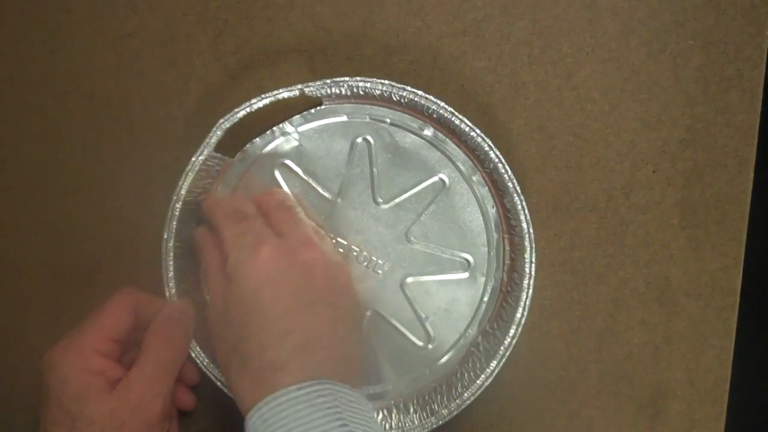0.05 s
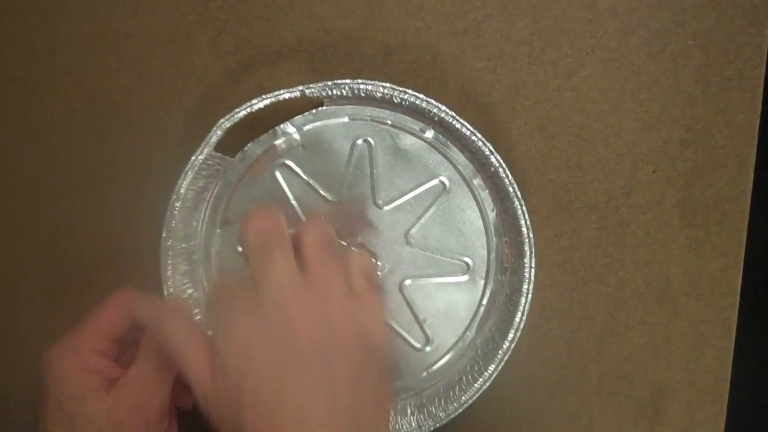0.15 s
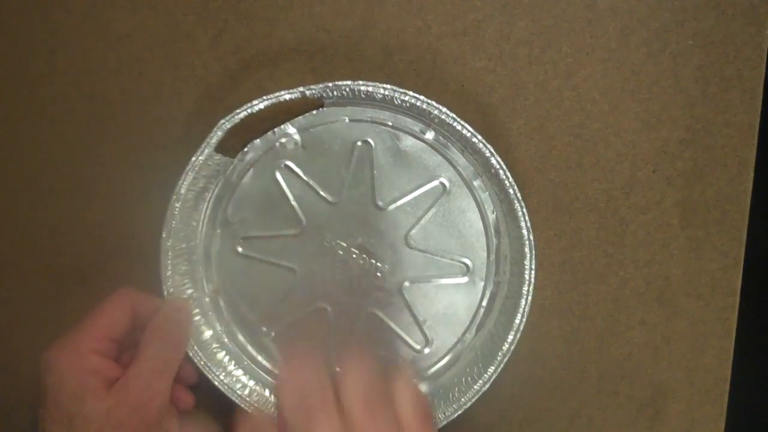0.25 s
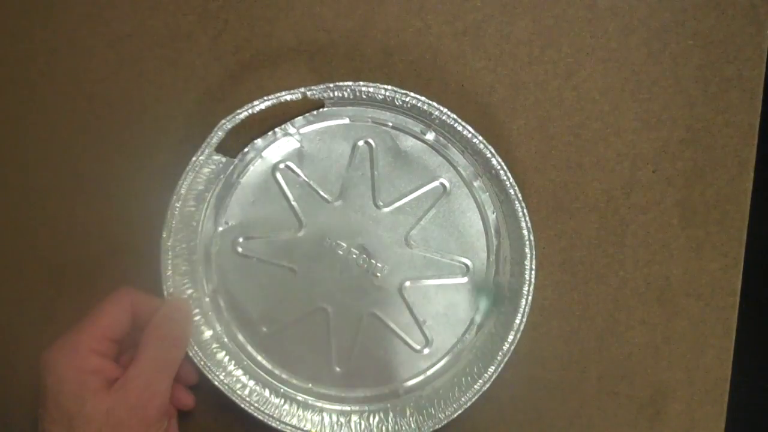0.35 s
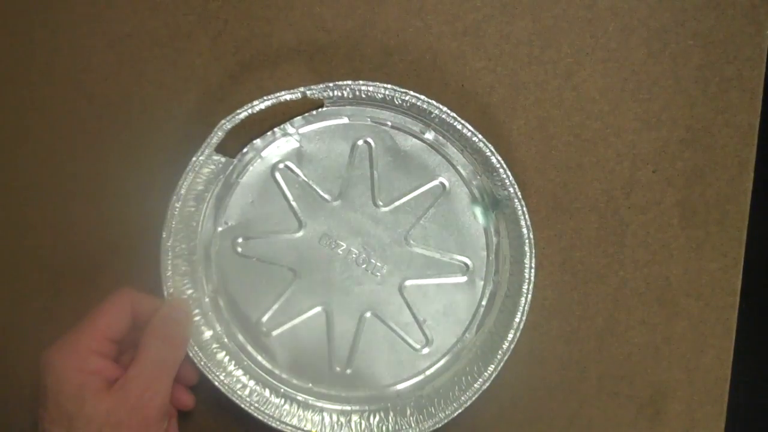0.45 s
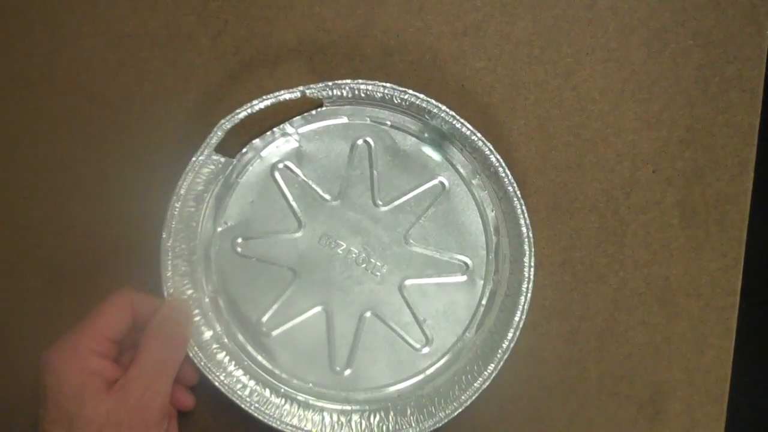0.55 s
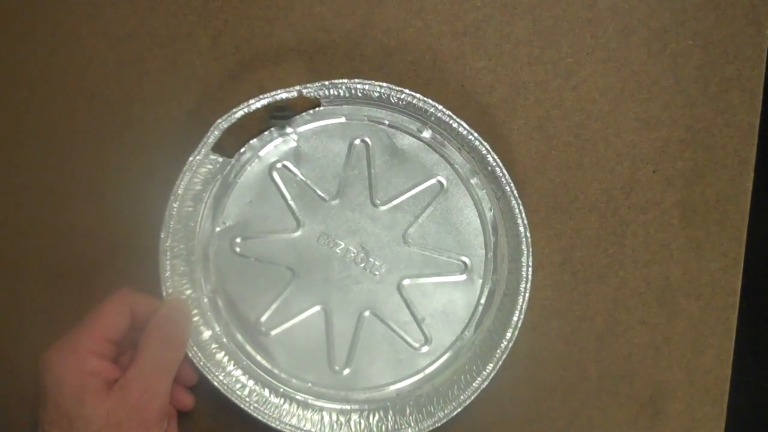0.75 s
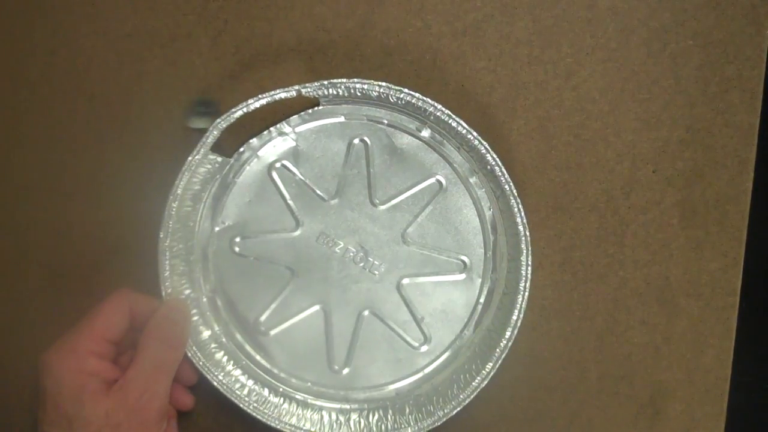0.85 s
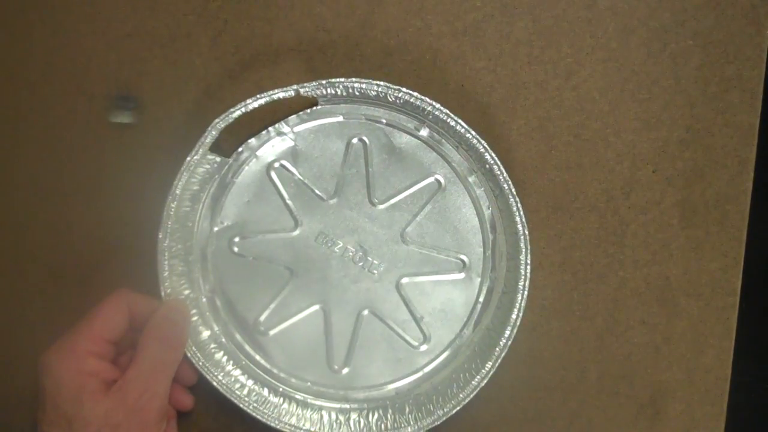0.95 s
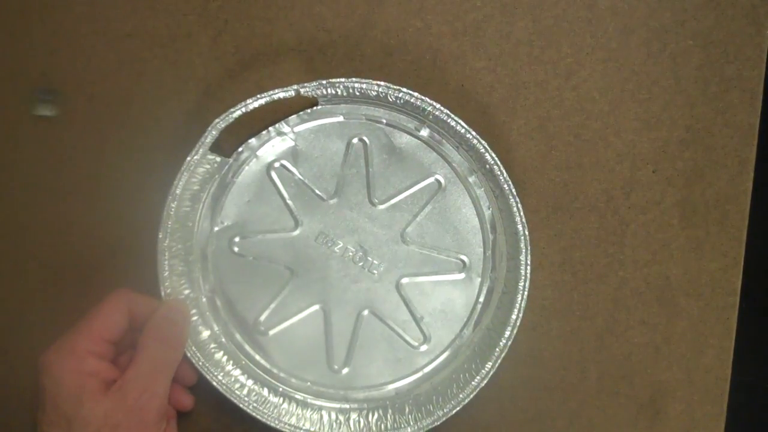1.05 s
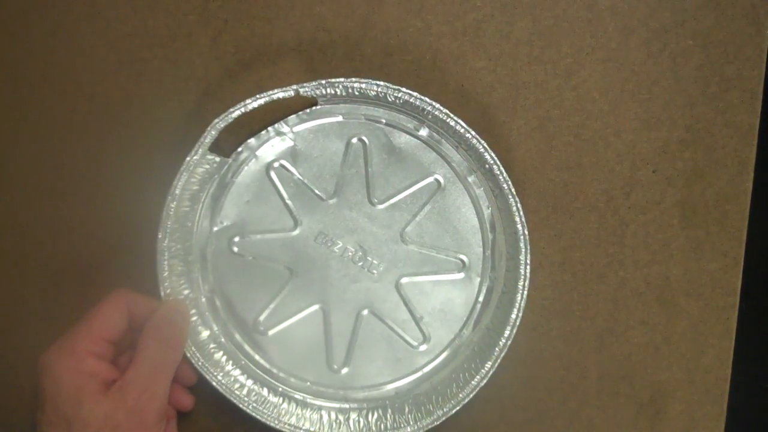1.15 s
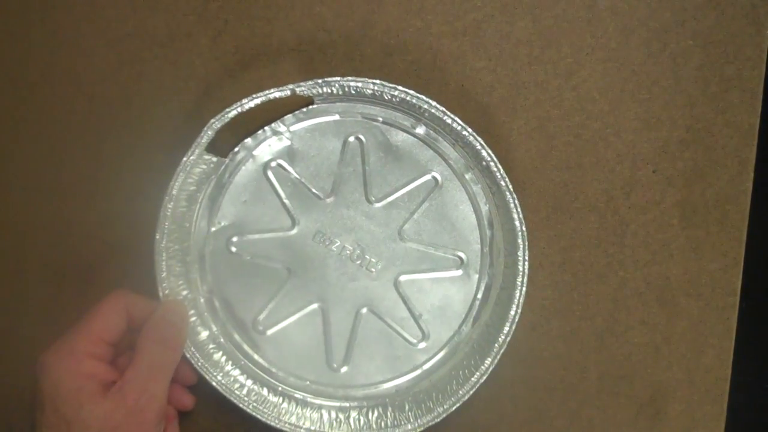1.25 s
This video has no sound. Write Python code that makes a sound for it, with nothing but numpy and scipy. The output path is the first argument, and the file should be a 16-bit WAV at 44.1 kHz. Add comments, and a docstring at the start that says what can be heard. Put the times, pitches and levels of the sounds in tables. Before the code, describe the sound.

Marble rolling fast round a thin metal pie plate, dropping out with a sharp click.

```python
"""Marble in a pie plate

A flicked glass marble runs round the wall of a thin aluminium pie plate, chattering over the crimps
as it slows; each impact rings the crowded modes of the foil. It leaves through a gap in the rim,
knocks sharply on the table and rolls away over the board. A small room, heard from close above."""
import sys
import numpy as np
from scipy import signal
from scipy.fft import rfft, irfft
from scipy.io import wavfile
from scipy.ndimage import uniform_filter1d, minimum_filter1d

SR = 44100
rng = np.random.default_rng(int(sys.argv[2]) if len(sys.argv) > 2 else 0)


def store_wav(level_fs):
    """Save 16-bit WAV to argv[1]."""
    pcm = np.round(np.clip(np.atleast_2d(level_fs), -1, 1) * 32767)
    wavfile.write(sys.argv[1], SR, pcm.T.astype(np.int16))


N = 57330

# Chatter on the crimps. Each row: start and length in seconds, level in dB, extra treble in dB.
RATTLES = [(.2315, .003, -26, -4), (0.2399, 0.0045, -30.5, 9), (0.247, 0.0048, -29.5, 13),
           (0.254, 0.018, -24, 4), (.272, 0.0034, -17.5, 2), (0.281, 0.0065, -22.5, 10),
           (0.289, 0.016, -21.5, -24), (.315, 0.0071, -21.5, 7.5), (0.353, .007, -20.5, 5),
           (0.367, 0.018, -25.5, -20), (0.391, 0.0038, -19, -5), (0.413, 0.012, -28, 7),
           (0.433, 0.0031, -19.5, -2.5), (0.456, 0.016, -25, 1.5), (0.483, 0.0022, -21.5, -2.5),
           (0.521, 0.012, -26, -0.5), (0.539, 0.0023, -28, 6.5), (0.551, .003, -32, 6.5),
           (0.575, 0.011, -40.5, 15.5), (0.614, 0.002, -21, -3.5), (0.621, 0.0036, -34, 8.5),
           (0.629, 0.0034, -28, 5.5), (0.646, 0.015, -30, 1.5), (0.665, 0.016, -38.5, 0.5),
           (0.692, 0.0046, -35.5, 7.5), (0.698, 0.0092, -30, 5), (0.746, 0.009, -28, 0.5),
           (0.798, 0.0081, -37.5, 10), (0.806, 0.011, -32.5, -5), (0.830, 0.0056, -29, -3),
           (0.8575, 0.005, -30, 5), (0.919, 0.0016, -42, 14.5), (0.931, 0.0054, -36.5, -3)]
# Hard ticks of glass on foil. Each row: time in seconds, relative level in dB.
TICKS = [(.188, -47), (.2326, -17.5), (.3905, -14), (.453, -20.5), (.5034, -12.5), (.511, -20), (.557, -27),
         (.563, -22.5), (.569, -22.5), (.602, -23.5), (.6135, -20), (.7695, -28), (.8105, -27),
         (.837, -24.5)]
# Steady rolling in the plate. Each row: time in seconds, foil level in dB, rumble level in dB.
PLATE_ROLL = [(.225, -87, -81), (.232, -49, -65), (.245, -31.5, -45), (.29, -40, -51), (.34, -35, -55),
              (.41, -34, -42.5), (.47, -35.5, -40), (.55, -34.5, -43), (.60, -38, -51.5), (.65, -43, -49.5),
              (.72, -38.5, -49.5), (.79, -40, -54.5), (.83, -40.5, -46.5), (.89, -41, -64),
              (.935, -42, -60.5), (.955, -72, -71)]
# Foil rustling under the fingers, up to the flick. Each row: time in seconds, level in dB.
HANDLING = [(0, -53), (.04, -59.5), (.14, -58.5), (.21, -63.5), (.23, -30.5), (.24, -89)]
# The plate's broad ring. Each row: frequency in Hz, relative dB at the path's start, middle and end.
FOIL_BODY = [(80, -73, -60, -58), (300, -26, -23.5, -26), (810, -15, -14, -14), (1036, -10, -8.5, -3),
             (1270, -1, 2, -1.5), (1710, -6.5, -5.5, -9), (2050, 3.5, -2, -10), (2500, -2, -4.5, -8),
             (3080, -4, -6, -5.5), (3980, -14, -14, -11.5), (6060, -10, -9.5, -12.5),
             (12400, -76, -90, -91)]
# The foil's bright sizzle and its low rumble. Each row: frequency in Hz, relative level in dB.
FOIL_TREBLE = [(200, -59), (1000, -31.5), (3000, -10), (4500, -9.5), (5400, -6), (6300, 3), (7100, 0.5),
               (7900, -1), (8700, -10.5), (10000, -18), (12000, -26), (14000, -27.5)]
FOIL_RUMBLE = [(30, -27), (65, -17), (110, -18.5), (200, -7.5), (290, -0.5), (370, 6), (450, -3.5),
               (640, 3), (900, -3), (1500, -14), (4000, -50)]
# The plate's clearest modes. Each row: frequency in Hz, level in dB, T60 in seconds,
# then the time and half width in seconds of the marble's passage over the antinode.
PLATE_MODES = [(978, -5, 0.13, 0.251, .012), (1044, -3, 0.066, 0.89, 0.047), (1090, -10, 0.14, .318, 0.026),
               (1152, -3.5, 0.056, 0.834, 0.061), (1205, -2.5, 0.079, 0.54, 0.038),
               (1224, 4, 0.054, 0.652, 0.031), (1256, -0.5, 0.049, 0.427, .04),
               (1395, 2, 0.033, 0.368, 0.011), (1450, -5, .12, 0.268, 0.0097),
               (1960, 8.5, 0.078, 0.2826, 0.0045), (2165, -4, 0.074, .32, 0.018),
               (2440, -6, 0.026, .68, 0.18), (2920, -4.5, 0.038, 0.415, 0.047),
               (3165, 0.5, 0.067, .75, 0.02), (3195, 5.5, 0.045, .86, .024), (3230, -10, .04, .355, .01),
               (5300, -4, 0.042, .86, 0.018)]
# Landing, hops and bumps on the table. Each row: time in seconds, level in dB, relative click in dB.
KNOCKS = [(0.9526, -2.5, -7.5), (0.985, -27.5, -8.5), (1.0553, -28.5, -13.5), (1.105, -33, -22),
          (1.1664, -32, -20), (1.172, -35.5, -9), (1.2528, -25.5, -15)]
# Modes of the table top. Each row: frequency in Hz, level in dB before filtering, T60 in seconds.
TABLE_MODES = [(825, -27.5, 0.0066), (1310, 0, 0.037), (1405, -11.5, 0.042), (1710, -19, 0.017),
               (1840, -19, 0.011), (2390, -16, 0.022), (3040, -28, 0.0083)]
# The board's click and its grain under the marble. Each row: frequency in Hz, relative level in dB.
TABLE_CLICK = [(100, -53), (430, -18.5), (680, 3.5), (1700, 18), (3000, 11), (6000, 5.5), (8000, 4.5),
               (11000, -14), (15000, -27)]
TABLE_GRAIN = [(60, -38), (250, -16.5), (600, -9), (1000, -4), (1400, 3.5), (1800, 2), (2400, -32),
               (3500, -29), (6000, -27), (12000, -53)]
# Rolling over the board. Each row: time in seconds, level in dB.
TABLE_ROLL = [(.96, -27), (.98, -34), (1.04, -41), (1.12, -42), (1.20, -40.5), (1.26, -37.5), (1.30, -40)]
# Reflections of the board's ring from nearby surfaces. Each row: delay in seconds, gain in dB.
ECHOES = [(.0023, -7), (.0034, -8), (.0106, -13)]
# Faint hiss with a narrow hum near 1.4 kHz, perhaps a distant marble rolling on the board.
# Each row: frequency in Hz, relative level in dB.
BACKGROUND = [(30, -5), (100, -2), (220, 5.5), (400, 2.5), (900, 0), (1220, 4), (1410, 8.5), (1600, -3.5),
              (1900, 1.5), (4000, -5.5), (6500, -7), (7900, -2.5), (9500, -13.5), (14000, -17.5)]
# The left microphone is the brighter. Each row: frequency in Hz, left minus right in dB.
MIC_BALANCE = [(100, 1), (2400, 0.5), (4400, 0.5), (6300, -3.5), (7200, 5), (8200, 9.5), (10000, 8),
               (12000, 15.5), (14000, 9)]
# Treble roll-off of both microphones. Each row: frequency in Hz, gain in dB.
MIC_ROLL_OFF = [(13900, -0.5), (14600, -23), (16000, -34)]

CONTACTS_PER_S, CONTACT_SCATTER_DB, EVEN_S = 4500, 4.5, 0.008
ATTACK_S, RELEASE_S = 0.00039, 0.0028
BODY_CORRELATION, TREBLE_CORRELATION = 0.86, 0.69  # between left and right
FOIL_T60_S, TICK_T60_S, CRACK_T60_S, CRACK_DB = 0.07, 0.032, 0.0092, 8.5
MODE_LAG_S, MODE_ROLL_DB = 0.003, -31.5  # a burst hits hardest just after its start; rolling is weak
TABLE_BAND_HZ, CLICK_T60_S, GRAIN_DB = (730, 2490), 0.031, -2.5
SNAP_DB, SNAP_T60_S = 5.5, 0.0073  # the first instant of glass on the board
ROOM_T60_S, ROOM_DB, ROOM_DELAY_S, BACKGROUND_DB = 0.57, -17, 0.0053, -56
LIMIT, LIMIT_S, TOP_HZ = 0.95, 0.001, 16000


def plate():
    """Incoherent impacts add in power and ring the foil; its floor rumbles under the marble's weight."""
    t = np.arange(N) / SR
    body_power = amp(curve(PLATE_ROLL)) ** 2
    treble_power = body_power + amp(curve(HANDLING)) ** 2
    for start, length, db, treble_db in RATTLES:
        attack = np.clip((t - start) / ATTACK_S, 0, 1)
        burst = attack * np.exp(-np.maximum(t - start - length, 0) / RELEASE_S)
        body_power += (burst * amp(db)) ** 2
        treble_power += (burst * amp(db + treble_db)) ** 2
    grains = contacts()
    push = grains * np.sqrt(body_power)
    body = travel(push, FOIL_BODY, BODY_CORRELATION)
    sizzle = travel(grains * np.sqrt(treble_power), FOIL_TREBLE, TREBLE_CORRELATION)
    ticks = 10 * drive(blows(TICKS), foil(FOIL_TREBLE, TREBLE_CORRELATION, TICK_T60_S))
    floor = unit(colour(signal.unit_impulse(N), FOIL_RUMBLE))
    rumble = drive(contacts() * amp(curve(PLATE_ROLL, column=2)), floor)
    return body + sizzle + pings(push) + ticks + rumble


def contacts():
    """Rolling contact is a dense train of random micro-impacts, here evened to an rms of 1."""
    hit = rng.random(N) < CONTACTS_PER_S / SR
    push = hit * rng.choice([-1, 1], N) * amp(CONTACT_SCATTER_DB * rng.standard_normal(N))
    return push / np.sqrt(uniform_filter1d(push ** 2, int(EVEN_S * SR)) + 1e-9)


def foil(spectrum, correlation, t60_s):
    """The modes of thin metal overlap into decaying noise: a crack, then a short ring."""
    envelope = fade(t60_s) + amp(CRACK_DB) * fade(CRACK_T60_S)
    return unit(colour(stereo_noise(correlation) * envelope, spectrum))


def travel(push, spectrum, correlation, spots=6):
    """A plate's response depends on the driving point, so it changes along the marble's path."""
    place = np.interp(np.arange(N) / SR, [PLATE_ROLL[0][0], PLATE_ROLL[-1][0]], [0, spots - 1])
    sound = 0
    for spot, progress in enumerate(np.linspace(0, 1, spots)):
        local = [(hz, np.interp(progress, np.linspace(0, 1, len(dbs)), dbs)) for hz, *dbs in spectrum]
        nearness = np.sqrt(np.maximum(1 - abs(place - spot), 0))
        sound += drive(push * nearness, foil(local, correlation, FOIL_T60_S))
    return sound


def pings(rolling):
    """A mode is driven best at its antinode, so the pitch of the pings changes along the wall."""
    t = np.arange(N) / SR
    strikes = blows([(start + MODE_LAG_S, db) for start, _, db, _ in RATTLES])
    push = strikes + amp(MODE_ROLL_DB) * rolling
    return sum(drive(push * np.exp(-((t - crossing) / width) ** 2), ring([(hz, db, t60)]))
               for hz, db, t60, crossing, width in PLATE_MODES)


def table():
    """Impact and rolling excite the same damped modes of the board; hard contact adds click and grain."""
    band = signal.butter(2, TABLE_BAND_HZ, "band", fs=SR, output="sos")
    board = signal.sosfilt(band, -ring(TABLE_MODES))
    board += drive(board, blows(ECHOES))[0]
    click_envelope = fade(CLICK_T60_S) + amp(SNAP_DB) * fade(SNAP_T60_S)
    click = unit(colour(stereo_noise(0.76) * click_envelope, TABLE_CLICK))
    knocks = drive(blows([(s, db) for s, db, _ in KNOCKS]), board)
    clicks = 10 * drive(blows([(s, db + click_db) for s, db, click_db in KNOCKS]), click)
    roll_gain = amp(curve(TABLE_ROLL))
    grain = colour(stereo_noise(0.91) * abs(contacts()), TABLE_GRAIN)
    rolling = drive(contacts() * roll_gain, unit(board))
    return knocks + clicks + rolling + amp(GRAIN_DB) * roll_gain * grain / grain.std()


def reverberation(direct):
    """Diffuse reflections arrive after a short delay and decay exponentially."""
    arrived = np.arange(N) / SR > ROOM_DELAY_S
    room = unit(stereo_noise(0.65) * fade(ROOM_T60_S) * arrived)
    return amp(ROOM_DB) * drive(direct, room)


def background():
    """Stationary noise is heard as hiss, and a narrow peak in its spectrum as a hum."""
    noise = colour(stereo_noise(0.35), BACKGROUND)
    return amp(BACKGROUND_DB) * noise / noise.std()


def amp(db):
    """Amplitude grows tenfold for every 20 dB."""
    return 10 ** (np.asarray(db) / 20)


def curve(points, column=1):
    """A level in dB moves linearly between timed rows, silent before the first."""
    rows = np.array(points)
    return np.interp(np.arange(N) / SR, rows[:, 0], rows[:, column], left=-120)


def colour(x, points):
    """Folding the cepstrum gives a causal, minimum-phase filter through (Hz, dB) points."""
    rows, size = np.array(points), 2 * N
    hz = np.maximum(np.fft.rfftfreq(size, 1 / SR), 1)
    gain = amp(np.interp(np.log(hz), np.log(rows[:, 0]), rows[:, 1]))
    cepstrum = irfft(np.log(gain))
    cepstrum[1:N] *= 2
    cepstrum[N + 1:] = 0
    return irfft(rfft(x, size) * np.exp(rfft(cepstrum)))[..., :N]


def unit(response):
    """A response scaled to unit energy preserves the power of white noise."""
    return response / np.sqrt(N * np.mean(response ** 2))


def drive(push, response):
    """A linear body convolves the force with its impulse response."""
    return signal.fftconvolve(np.atleast_2d(push), np.atleast_2d(response), axes=-1)[:, :N]


def fade(t60_s):
    """Damping gives an exponential decay, 60 dB in t60_s."""
    return np.exp(-np.log(1000) * np.arange(N) / SR / t60_s)


def stereo_noise(correlation):
    """The balance of common and opposed noise sets the correlation of left and right."""
    mid, side = rng.standard_normal((2, N))
    return np.sqrt((1 + correlation) / 2) * mid + np.sqrt((1 - correlation) / 2) * np.array([side, -side])


def ring(modes):
    """Struck modes are damped sines, differentiated because a small radiator gives out no bass."""
    t = np.arange(N) / SR
    sound = 0
    for hz, db, t60 in modes:
        omega = 2 * np.pi * hz
        sound += amp(db) * np.diff(fade(t60) * np.sin(omega * t), prepend=0) * SR / omega
    return sound


def blows(rows):
    """A brief contact acts as an impulse, one for each (seconds, dB) row."""
    push = np.zeros(N)
    for s, db in rows:
        push[int(round(s * SR))] += amp(db)
    return push


def scene():
    """Plate, table, reverberation and background add by superposition."""
    direct = plate() + table()
    return direct + reverberation(direct) + background()


def record(dry):
    """Two unlike microphones colour the sound; a fast limiter holds down peaks and the top is cut."""
    heard = np.array([colour(channel, [(hz, sign * db / 2) for hz, db in MIC_BALANCE])
                      for channel, sign in zip(dry, (1, -1))])
    window = int(LIMIT_S * SR)
    held_gain = minimum_filter1d(LIMIT / np.maximum(abs(heard), LIMIT), 2 * window)
    gain = uniform_filter1d(uniform_filter1d(held_gain, window), window)
    low_pass = signal.ellip(8, 0.2, 70, TOP_HZ, fs=SR, output="sos")
    return signal.sosfilt(low_pass, colour(heard * gain, MIC_ROLL_OFF))


dry = scene()
out = record(dry)
store_wav(out)
```